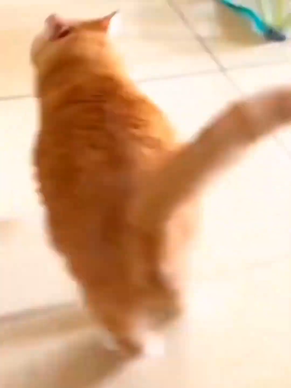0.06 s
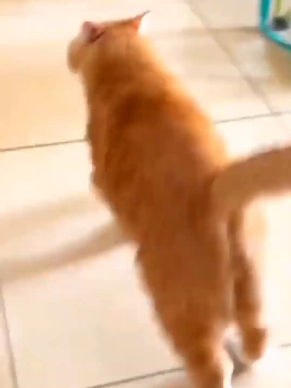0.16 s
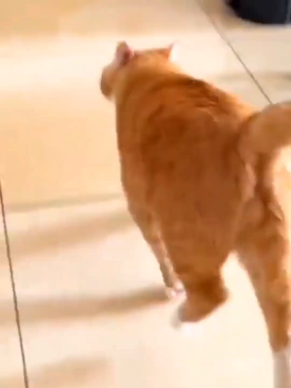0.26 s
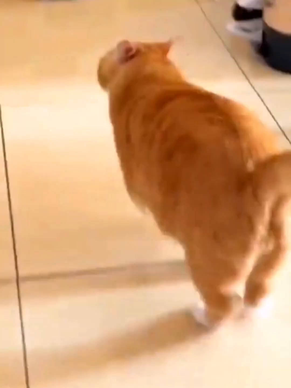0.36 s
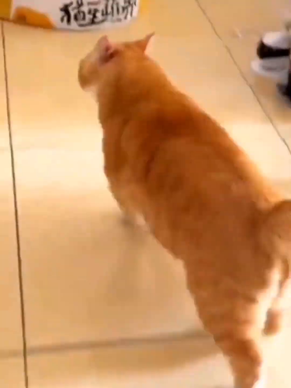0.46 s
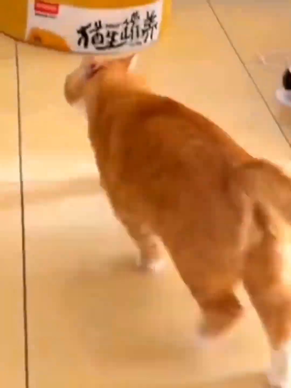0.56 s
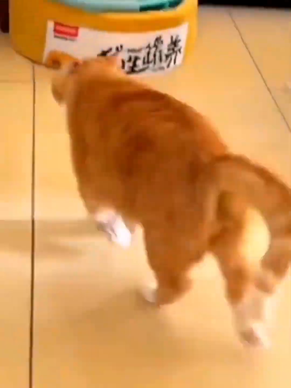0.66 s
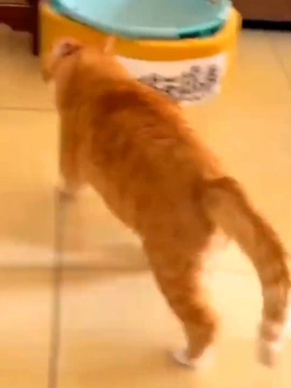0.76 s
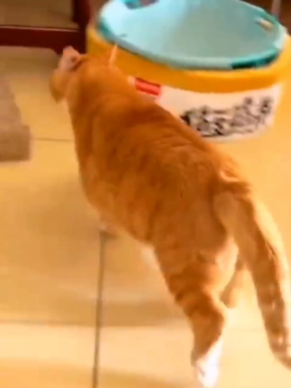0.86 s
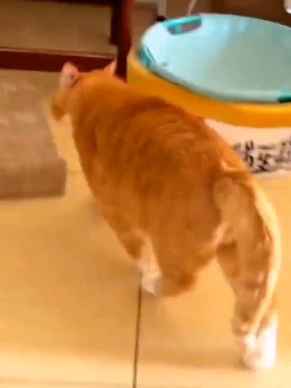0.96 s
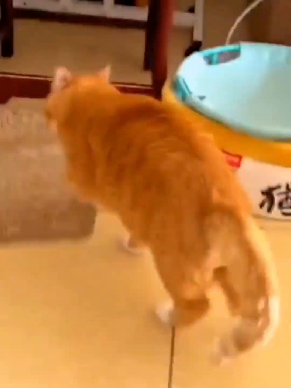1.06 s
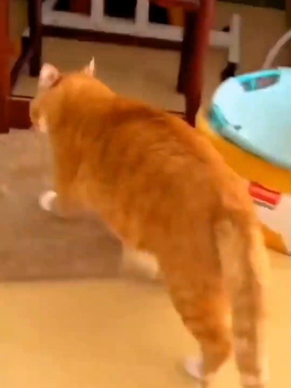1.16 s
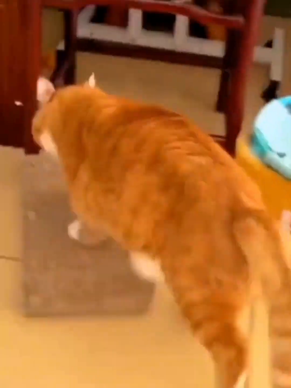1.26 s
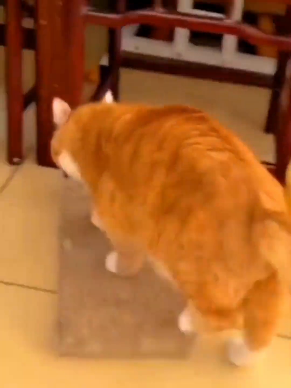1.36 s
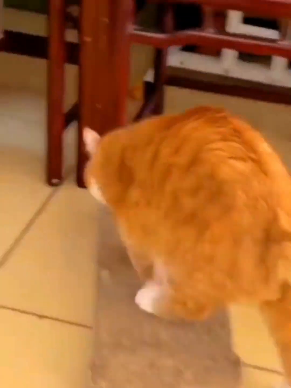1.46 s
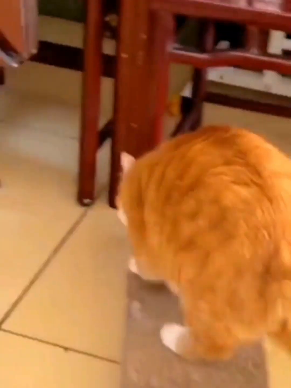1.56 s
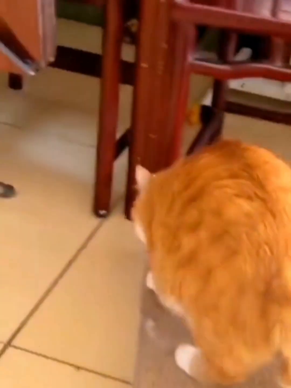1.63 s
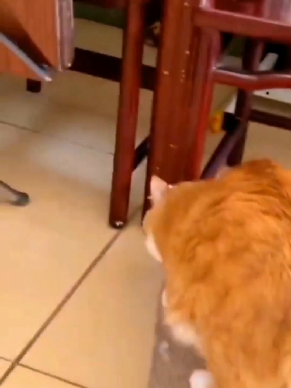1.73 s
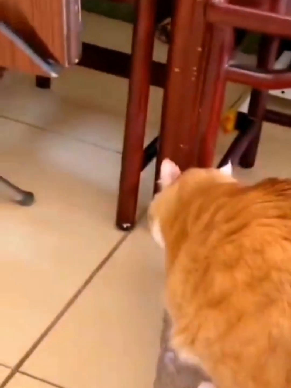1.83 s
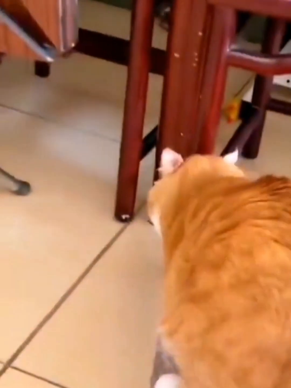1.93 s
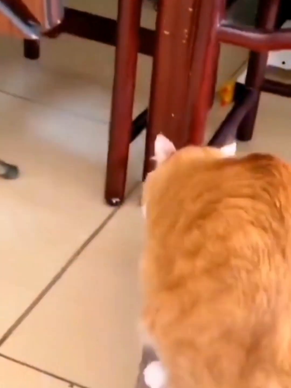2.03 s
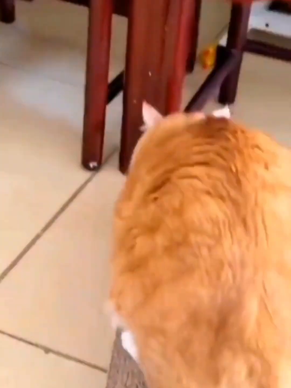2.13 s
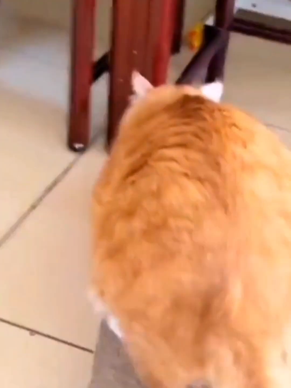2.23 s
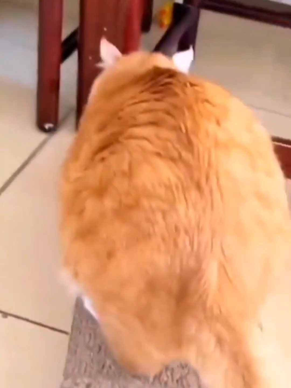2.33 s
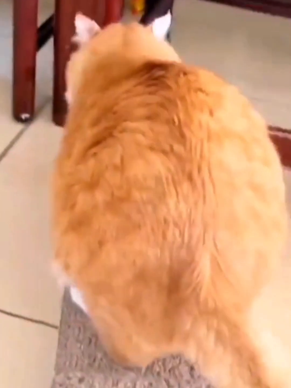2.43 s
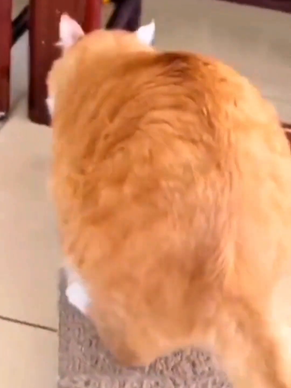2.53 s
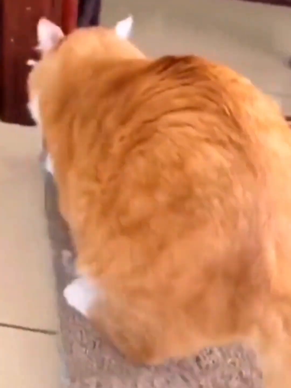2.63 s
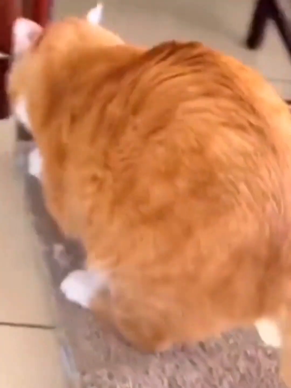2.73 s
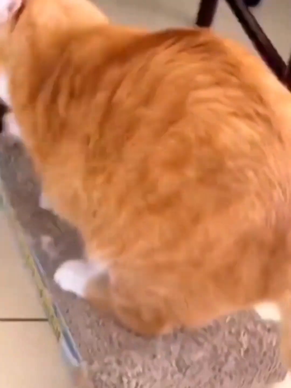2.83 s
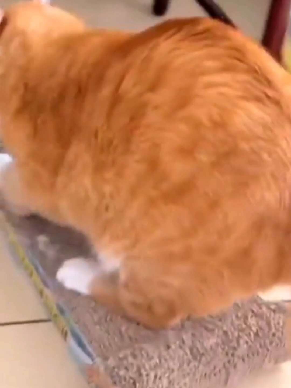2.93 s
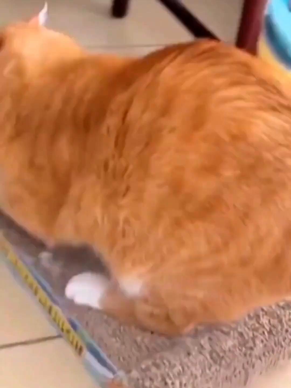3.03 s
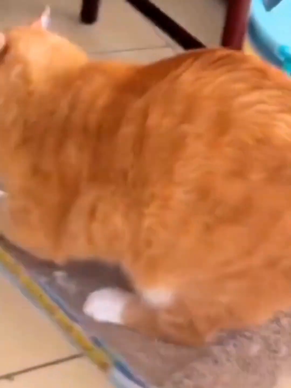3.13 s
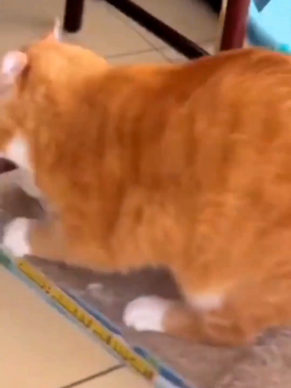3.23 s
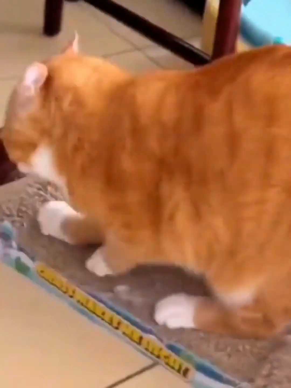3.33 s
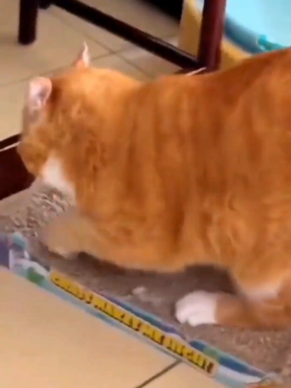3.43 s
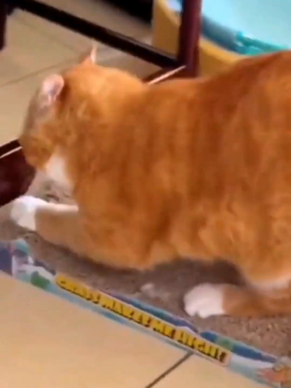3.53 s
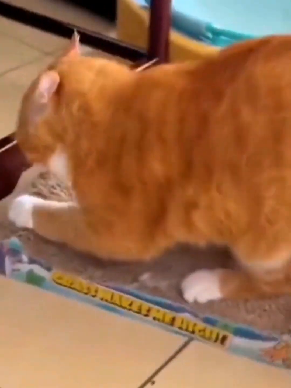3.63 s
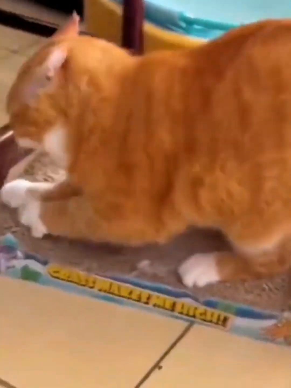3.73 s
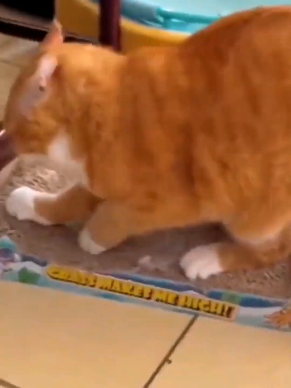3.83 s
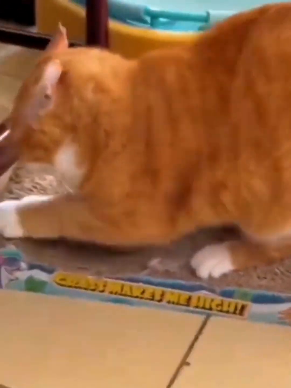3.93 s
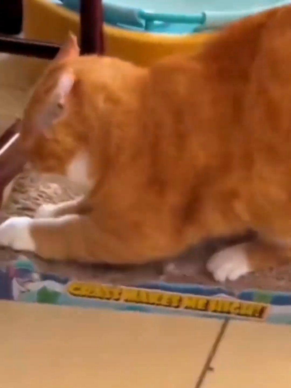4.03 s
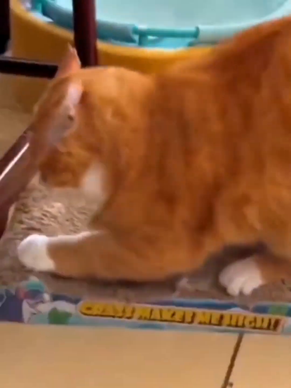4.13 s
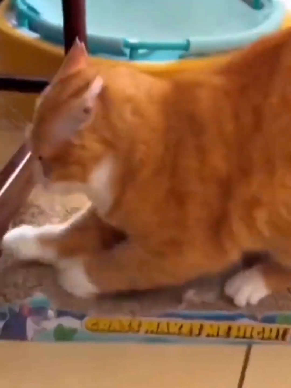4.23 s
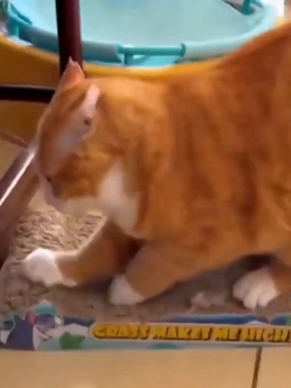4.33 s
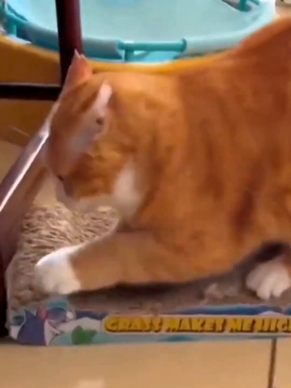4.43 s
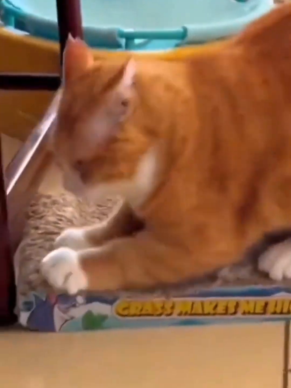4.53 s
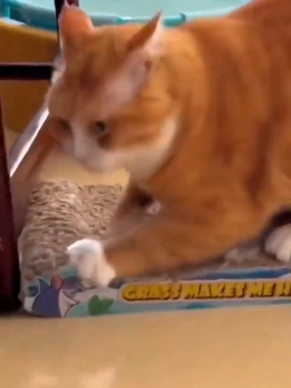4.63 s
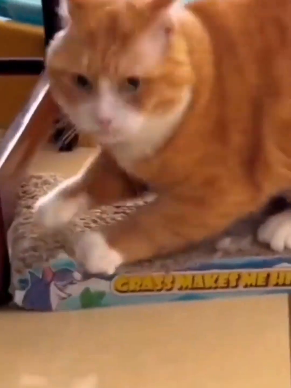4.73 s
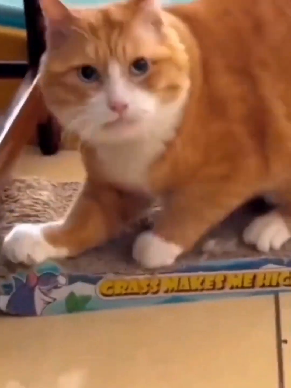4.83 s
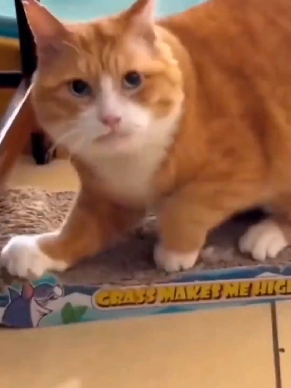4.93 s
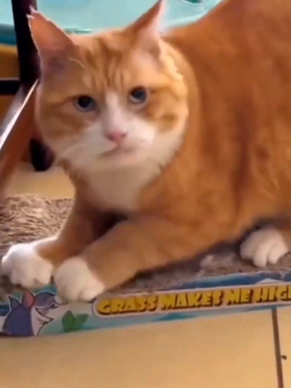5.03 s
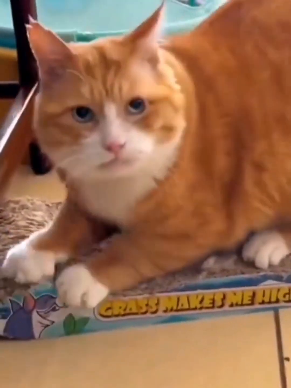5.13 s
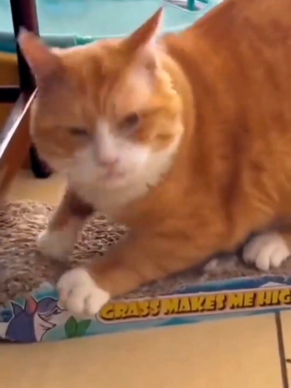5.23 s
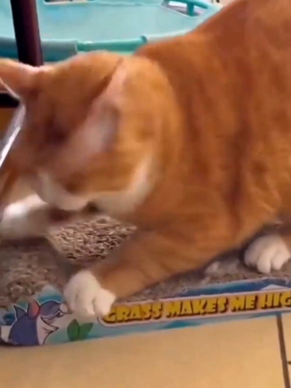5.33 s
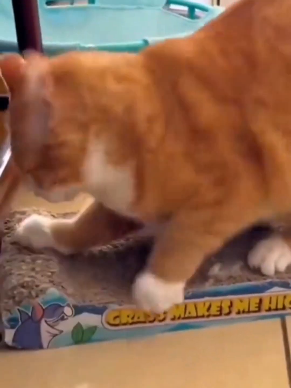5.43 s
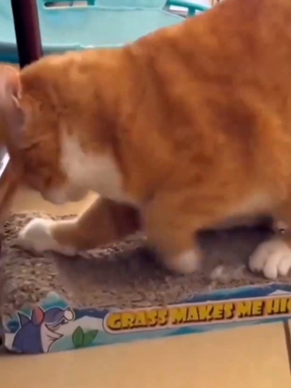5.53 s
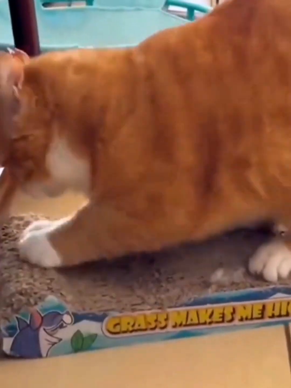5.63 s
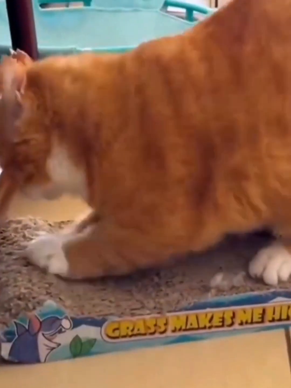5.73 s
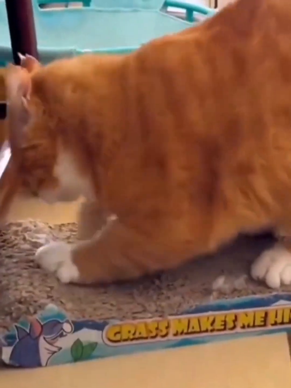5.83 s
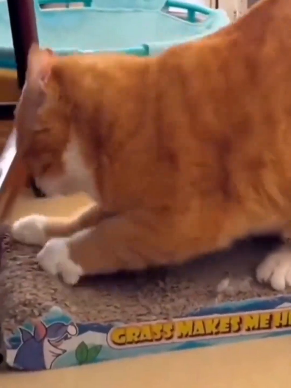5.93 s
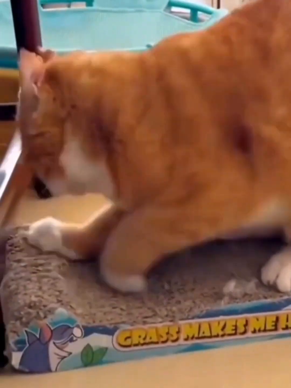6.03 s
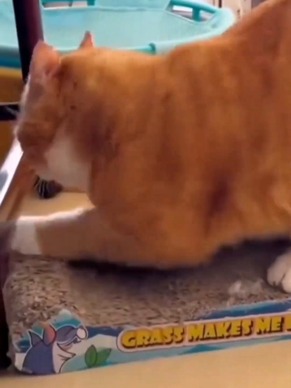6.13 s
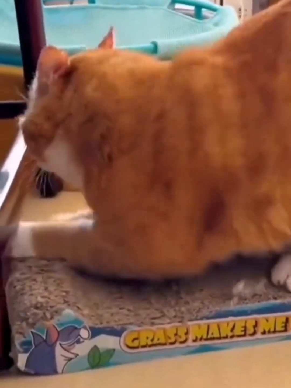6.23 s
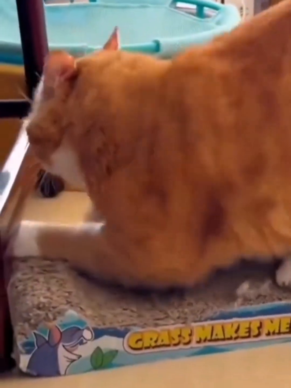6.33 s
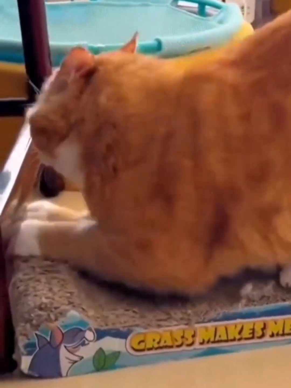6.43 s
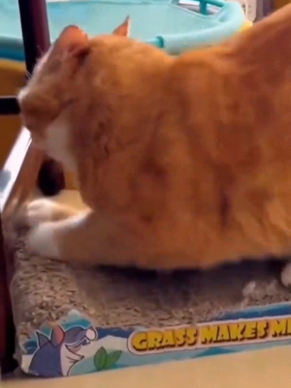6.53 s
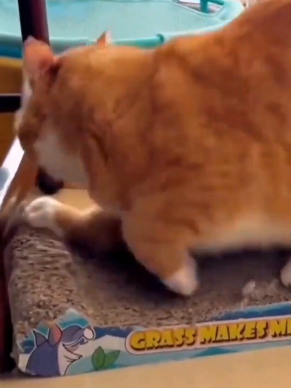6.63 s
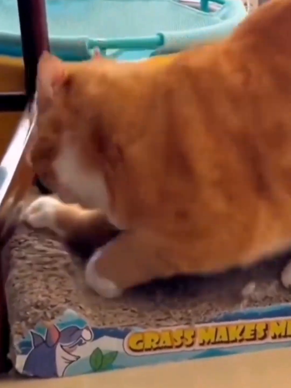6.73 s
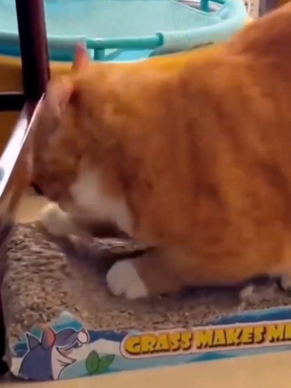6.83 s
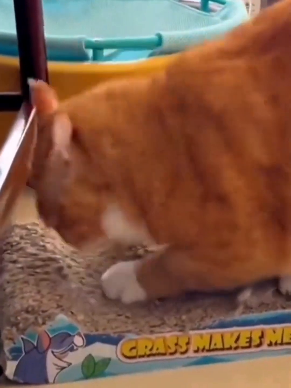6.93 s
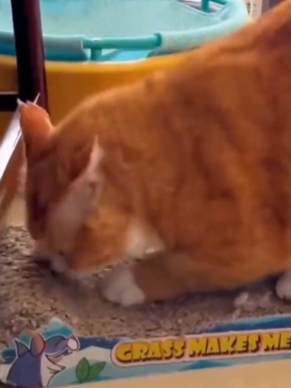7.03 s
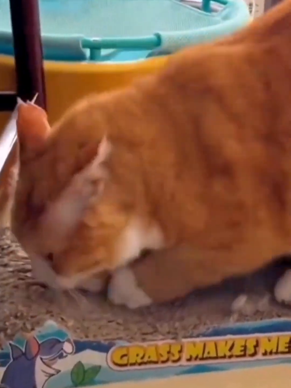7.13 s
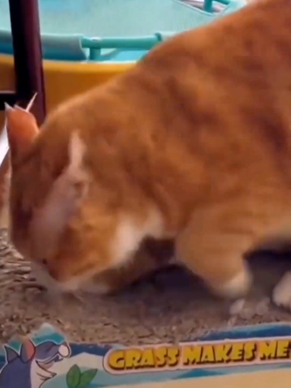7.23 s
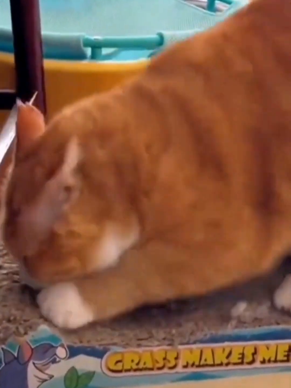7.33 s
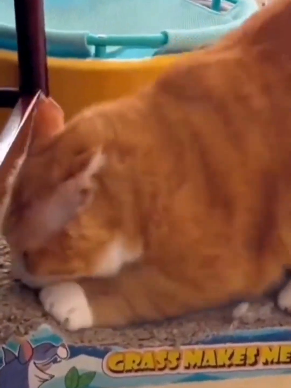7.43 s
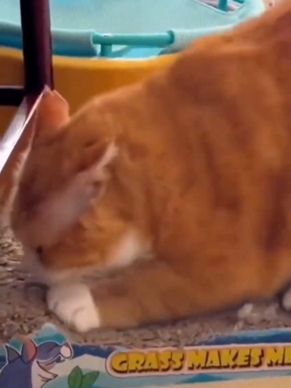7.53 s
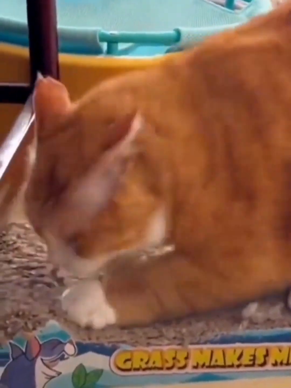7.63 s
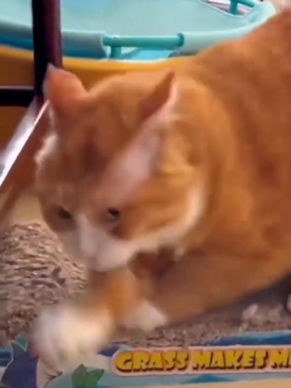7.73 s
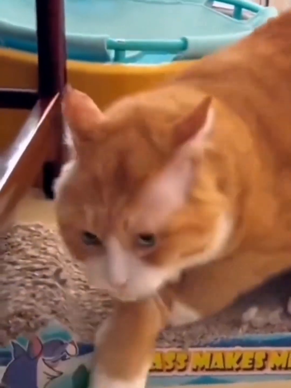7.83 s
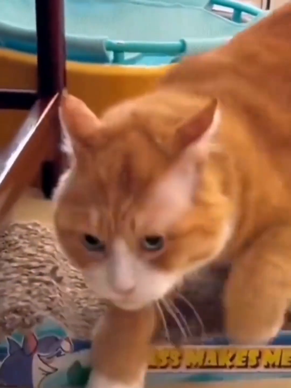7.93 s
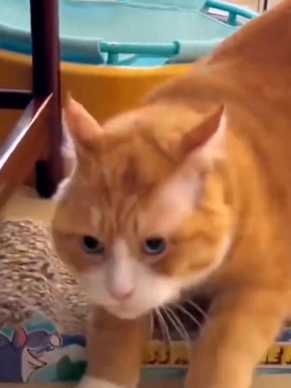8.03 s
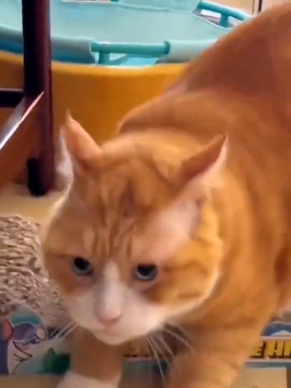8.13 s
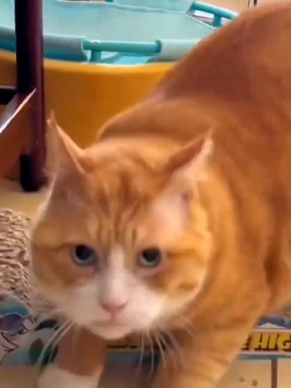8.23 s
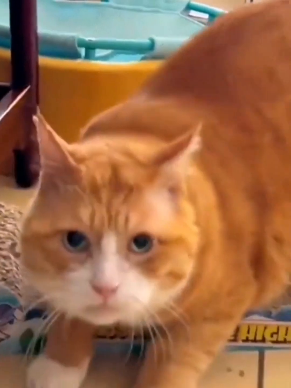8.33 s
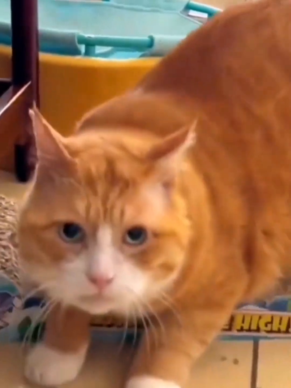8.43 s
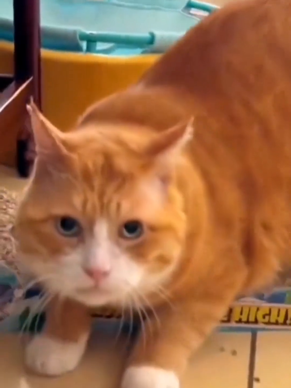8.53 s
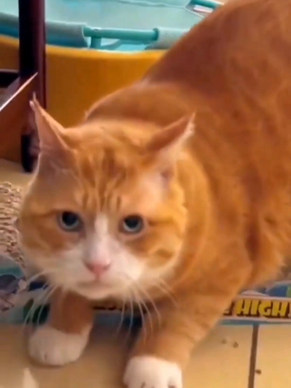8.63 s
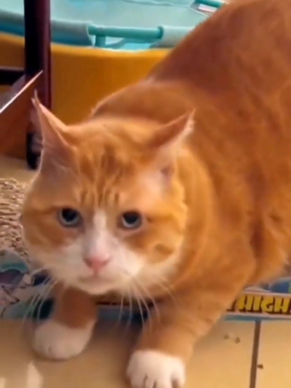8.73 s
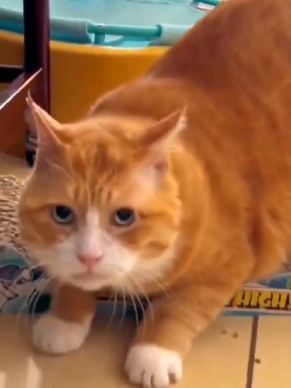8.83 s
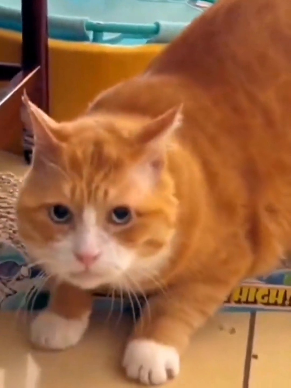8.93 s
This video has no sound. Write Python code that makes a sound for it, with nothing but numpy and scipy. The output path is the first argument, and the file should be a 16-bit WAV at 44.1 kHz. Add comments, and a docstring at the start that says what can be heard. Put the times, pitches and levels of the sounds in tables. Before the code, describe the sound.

A few soft footsteps cross a tiled floor with a dull bump. Then a cat claws a corrugated cardboard scratcher close to the microphone: short, uneven scrapes drum the hollow board, tear fibres and snap free, with fur rubbing in between. The scratching stops near the end, leaving a low room hum. The hand-held microphone rumbles faintly, and the room has a short echo.

```python
"""A cat rakes a corrugated cardboard scratcher with both front paws, close ahead of the microphone.
Claws skip across the flutes, drumming the hollow board, tearing fibres and snapping free; fur rubs.
The place is a room with a tiled floor, a short echo and a low hum. The cat first walks to the board,
and a person follows with a hand-held camera: soft steps, dull bumps and handling rumble reach
its stereo microphone, and a limiter holds the peaks."""
import sys
import numpy as np
from scipy import signal
from scipy.fft import rfft, irfft, next_fast_len
from scipy.io import wavfile
from scipy.ndimage import uniform_filter1d, minimum_filter1d

SR = 44100
rng = np.random.default_rng(int(sys.argv[2]) if len(sys.argv) > 2 else 0)


def unload_audio(sound):
    """Save the sound as a 16-bit wav file, at the path given as the first command line argument."""
    columns = np.transpose(np.atleast_2d(sound))
    # keep every value between -1 and 1, then stretch to whole-number steps
    steps = np.round(np.clip(columns, -1, 1) * 32767)
    wavfile.write(sys.argv[1], SR, steps.astype(np.int16))


N = 395577
TIME = np.arange(N) / SR

# pulls of a paw: (start [s], length [s], force [dB], board pitch [Hz], tearing [dB])
PAW_PULLS = [(1.454, 0.15, -29.5, 500, -34.5), (1.63, 0.022, -18.5, 456, -24.5),
             (1.662, 0.031, -10.5, 573, -20), (1.846, 0.042, -10, 750, -16.5),
             (2.116, 0.069, -15.5, 634, -37), (2.248, 0.099, -15, 740, -26.5),
             (2.344, 0.031, -7.5, 734, -20), (2.568, 0.046, -17.5, 635, -28), (2.687, 0.045, -8, 725, -13),
             (2.79, 0.059, -30, 593, -25), (3.009, 0.065, -22.5, 450, -20.5), (3.07, 0.08, -24, 646, -18),
             (3.175, 0.056, -15, 800, -18), (3.445, 0.048, -17.5, 730, -28.5),
             (3.512, 0.15, -23.5, 656, -27), (3.665, 0.042, -12, 690, -20), (3.927, 0.088, -18.5, 635, -32),
             (4.015, 0.048, -19.5, 614, -20.5), (4.109, 0.042, -12, 640, -19),
             (4.286, 0.069, -26, 610, -35.5), (4.489, 0.11, -22, 640, -25),
             (4.629, 0.053, -13.5, 700, -23.5), (4.716, 0.039, -17, 637, -18),
             (4.953, 0.07, -30.5, 545, -33), (5.029, 0.042, -21, 534, -27), (5.281, 0.03, -8, 680, -21),
             (5.589, 0.087, -15.5, 790, -30), (5.872, 0.025, -16, 657, -31.5),
             (6.121, 0.028, -23, 730, -48), (6.333, 0.038, -20.5, 526, -27.5), (6.43, 0.037, -17, 513, -26),
             (6.468, 0.063, -21, 617, -44), (6.697, 0.085, -21, 529, -38.5), (6.768, 0.053, -22, 675, -51),
             (6.983, 0.028, -17.5, 784, -26.5), (7.042, 0.047, -14, 693, -32),
             (7.357, 0.049, -24.5, 670, -36), (7.455, 0.035, -23, 570, -25.5),
             (7.564, 0.057, -14, 595, -23.5), (7.673, 0.034, -22.5, 603, -34.5),
             (7.756, 0.039, -20, 720, -24), (7.972, 0.25, -78, 670, -43), (8.918, 0.1, -36.5, 685, -32)]
# soft footfalls on the tiles: (time [s], sole level [dB], tick level [dB])
FOOTSTEPS = [(0.063, -40, -41.5), (0.225, -24.5, -35.5), (0.292, -22, -43), (0.344, -15, -34),
             (0.713, -18.5, -33.5), (0.918, -23.5, -41.5), (1.06, -15, -48), (1.336, -28.5, -42)]
# spectrum of the shaken board: (frequency [Hz], level [dB])
BOARD_SPECTRUM = [(45, 0.5), (240, 7.5), (590, 14.5), (1350, 9), (2050, 6), (2750, -2.5), (5100, -3.5),
                  (11000, -46)]
# spectrum of tearing paper: (frequency [Hz], level [dB])
TEAR_SPECTRUM = [(500, 4), (1500, 3.5), (2900, 0.5), (4000, 4.5), (5200, -1.5), (6600, 0), (8000, -20.5),
                 (13000, -48)]
# spectrum of fine fibres parting: (frequency [Hz], level [dB])
HISS_SPECTRUM = [(2500, -3.5), (7000, 6), (12300, 2.5), (13500, -27)]
# the part of the room sound that differs between left and right: (frequency [Hz], level [dB])
ROOM_WIDTH = [(70, -45), (260, -7), (3500, 1), (8500, 3.5)]
SWAY_S, SETTLE_S = 0.048, 0.057  # rise and decay of the rustle and camera jolt at each step


def scratcher(pull_db=-2):
    """The cat at the board: every pull and pluck rings on in a mode of the whole scratcher."""
    # a claw snaps free of a flute or taps it: (time [s], board [dB], board pitch [Hz], crack [dB])
    plucks = [(1.847, -0.5, 1125, -17), (2.586, -18, 820, -33), (2.949, -15, 1120, -18),
              (3.019, -30, 1220, -17), (3.361, -17.5, 784, -46), (3.465, -27, 704, -42),
              (3.52, -11.5, 780, -21.5), (3.54, -8, 755, -8.5), (3.564, -18, 634, -13),
              (3.919, -13, 1120, -12.5), (4.468, -8.5, 560, -23), (4.505, -12, 620, -38),
              (4.974, -17.5, 566, -24), (5.066, -15, 830, -13.5), (5.495, -11.5, 940, -46),
              (5.562, -16, 814, -35), (5.653, -11.5, 770, -37), (5.731, -9.5, 1030, -23.5),
              (5.795, -15.5, 860, -20), (5.849, -9, 820, -17.5), (6.13, -7.5, 690, -36),
              (6.16, -12.5, 816, -48), (6.266, -13, 995, -34), (6.35, -11.5, 518, -35),
              (6.435, -4.5, 500, -23.5), (6.545, -16.5, 537, -42), (6.686, -6.5, 777, -24),
              (6.699, -13, 750, -27), (6.902, -12.5, 1570, -23), (7.043, -5, 1010, -14.5),
              (7.368, -12.5, 1260, -26), (7.39, -7.5, 700, -30), (7.565, -18, 960, -20.5),
              (7.757, -11.5, 770, -38), (7.965, -31.5, 1410, -63), (8.012, -30.5, 1840, -39),
              (8.36, -59, 1890, -38.5)]
    # hiss of the fine fibres against the tearing: (time [s], level [dB])
    fibre_hiss = [(1.46, -5), (1.85, -45), (2.7, -14), (3.07, -8), (3.18, -14.5), (4.1, -11), (4.4, -2),
                  (4.72, -8.5), (4.97, 6), (5.6, -7), (7.95, -12), (8.92, 9)]
    # rasp of the stiff walls against the force, lower on a hollower spot: (time [s], level [dB])
    wall_rasp = [(5.3, 2.5), (5.55, 0), (6.75, 3), (7.0, 6)]
    # mode of the whole scratcher: (frequency [Hz], bandwidth [Hz], level [dB])
    board_modes = [(609, 9, -15)]
    claws = np.zeros(N)
    for start, length, force_db, hz, tear_db in PAW_PULLS:
        hiss_db = tear_db + np.interp(start, *np.transpose(fibre_hiss))
        rasp_db = np.interp(start, *np.transpose(wall_rasp))
        onset, sound = paw_pull(start, length, force_db, hz, tear_db, hiss_db, rasp_db)
        add(claws, onset, amp(pull_db) * sound)
    for onset, board_db, hz, crack_db in plucks:
        add(claws, onset, claw_snap(board_db, hz, crack_db))
    return claws + sum(amp(db) * resonate(claws, hz, hz / width) for hz, width, db in board_modes)


def paw_pull(start, length, board_db, hz, tear_db, hiss_db, rasp_db,
             attack_s=0.0046, release_s=0.0073, arch_db=7.0, lead=0.057,
             scrape=0.51, glide=-0.31, wall_ratio=1.706, bite=0.11, hiss_rise=0.36, size=11000):
    """Each slip drums the hollow board, each snag tears paper, fibres hiss; returns (onset, sound)."""
    t = np.arange(size) / SR
    along = np.minimum(t / length, 1) - .5
    contact = np.minimum(t / attack_s, 1) * np.exp(-np.maximum(t - length, 0) / release_s)
    grip = contact * amp(-arch_db * (2 * (along + lead)) ** 2)  # hardest just before mid-pull
    jumps = slips(size, per_s=400, jitter=.7, spread_db=3.5)
    snags = slips(size, per_s=130, jitter=0.6, spread_db=2.5)
    rip = unit(unit(fade(snags, seconds=0.0028)) + .7)
    force = (unit(jumps - jumps.mean()) + scrape * rip * rng.standard_normal(size)) * grip
    shake = colour(dispersed(force, seconds=0.00067), BOARD_SPECTRUM)
    note = hz * (1 + glide * along)  # sinks as the paw is drawn in
    drum = hollow(shake, note, q=1.64)
    spot_ring = amp(-2.5) * resonate(drum, hz, q=51)  # the spot under the paw rings on
    drum = amp(board_db) * unit(drum + spot_ring)
    # claws that bite deeper also rasp the stiff walls
    wall_db = board_db + rasp_db + bite * (tear_db - board_db)
    rasp = amp(wall_db) * hollow(shake * rip, wall_ratio * note, q=0.77)
    # fibres part one by one, in clumps behind each snag; their hiss builds as the claws sink in
    breaks = crackle(size, per_s=7000, spread_db=1.0) * rip * grip
    tear = dispersed(colour(breaks, TEAR_SPECTRUM), seconds=.0006)
    swell = np.minimum(t / (hiss_rise * length), 1)
    fine_breaks = crackle(size, per_s=9000, spread_db=4.0) * np.sqrt(rip) * grip * swell
    hiss = colour(fine_breaks, varied(HISS_SPECTRUM, db=3.0))
    sound = drum + rasp + amp(tear_db) * unit(tear) + amp(hiss_db) * unit(hiss)
    return start - attack_s / 2, sound * np.sqrt(length / t[-1])


def claw_snap(board_db, hz, crack_db, span_s=0.0091, peak_cycles=2.07, swing_cycles=1.25,
              rebound_s=0.00578, rebound_db=-7, rebound_ratio=0.743,
              rattle_db=-5, rattle_cycles=7, size=3000):
    """A flute cracks; the board swings a few times, drops back with a lower knock and rattles."""
    t = np.arange(size) / SR
    rattle = rng.standard_normal(size) * np.exp(-t * hz / rattle_cycles)  # briefer at higher notes
    swing, rebound = (
        np.sin(2 * np.pi * turns) * np.exp(-((turns - peak_cycles) / swing_cycles) ** 2) * (turns > 0)
        for turns in (hz * t, rebound_ratio * hz * (t - rebound_s)))
    board_rattle = unit(resonate(colour(rattle, BOARD_SPECTRUM), hz, q=0.43))
    knock = unit(unit(swing + amp(rebound_db) * rebound) + amp(rattle_db) * board_rattle)
    tip = rng.standard_normal(size) * np.exp(-t / .0013)
    burst = tip + 0.25 * rattle
    crack = unit(colour(burst, TEAR_SPECTRUM) + 0.14 * colour(burst, HISS_SPECTRUM))
    return (amp(board_db) * knock + amp(crack_db) * crack) * np.sqrt(span_s / t[-1])


def slips(n, per_s, jitter, spread_db, count=160):
    """A claw jumps from flute to flute at uneven intervals, with uneven force."""
    gap, size = rng.standard_normal((2, count))
    at = np.cumsum(np.exp(jitter * gap)) * SR / per_s
    at = (at - at[0] * rng.random()).astype(int)
    force = amp(spread_db * np.clip(size, -2, 1.5))
    train = np.zeros(n)
    np.add.at(train, at[at < n], force[at < n])
    return train


def crackle(n, per_s, spread_db):
    """Random impulses of uneven size, as of fibres breaking."""
    chance, size, push = rng.random(n), rng.standard_normal(n), rng.choice([-1, 1], n)
    return (chance < per_s / SR) * push * amp(spread_db * np.minimum(size, 2))


def dispersed(x, seconds, size=600):
    """Bending waves cross the board by many paths, smearing each knock over a few milliseconds."""
    paths = rfft(rng.standard_normal(size) * np.exp(-np.arange(size) / (seconds * SR)), 2 * size)
    smear = irfft(paths / np.sqrt(abs(paths)))[:size]
    return signal.fftconvolve(x, smear)[:len(x)]


def varied(spectrum, db):
    """Every claw and every spot of paper has a colour of its own."""
    return [(hz, value + db * rng.standard_normal()) for hz, value in spectrum]


def brushing(patchy_db=3.5, slide_db=-12.5, rustle_db=-26.5, graze_db=-20, patch_samples=900):
    """Fur and pads drag with an uneven grain as the cat moves and its paws slide; each step rustles."""
    # fur rubbing as the cat moves about: (time [s], level [dB])
    cat_motion = [(0, -35), (1.3, -38), (1.7, -32.5), (2.9, -30), (3.7, -26), (4.3, -29), (4.88, -37),
                  (5.15, -31), (5.45, -34), (6.0, -37.5), (6.5, -32.5), (6.85, -36), (7.3, -35),
                  (7.75, -33), (8.2, -61)]
    # spectrum of rubbing fur: (frequency [Hz], level [dB])
    fur_spectrum = [(60, -5), (400, 2.5), (1500, -4), (6500, -18), (13000, -36)]
    uneven = uniform_filter1d(rng.standard_normal(N), patch_samples)
    uneven = unit(uniform_filter1d(uneven, patch_samples // 2))
    grain = crackle(N, per_s=9000, spread_db=2.5) * amp(patchy_db * np.tanh(uneven))
    drag = unit(colour(grain, fur_spectrum))
    # the paw reaches out before each pull and slides off after it
    mid_pulls = [(start + length / 2, db) for start, length, db, *_ in PAW_PULLS]
    slide = swells(mid_pulls, rise_s=0.031, decay_s=0.026)
    rustle = swells(FOOTSTEPS, SWAY_S, SETTLE_S)
    rubbing = level(cat_motion) + amp(slide_db) * slide + amp(rustle_db) * rustle
    # claw tips graze single flutes as a paw slides
    grazes = fade(abs(crackle(N, per_s=45, spread_db=5.0)), seconds=0.0036) * rng.standard_normal(N)
    return rubbing * drag + amp(graze_db) * slide * unit(colour(grazes, BOARD_SPECTRUM))


def footfalls(tick_hz=1490, tick_s=0.004, bump_s=0.005):
    """Soft soles scuff the tiles and land with a tick; now and then something takes a dull bump."""
    # spectrum of a soft sole on tile: (frequency [Hz], level [dB])
    sole_spectrum = [(30, -17), (150, 4), (480, -1.5), (700, -8.5), (4500, -24.5), (13000, -51)]
    # dull bumps and knocks: (time [s], level [dB], pitch [Hz])
    bumps = [(1.081, -8, 485), (1.479, -20.5, 390), (2.11, -15.5, 91), (3.035, -12.5, 270),
             (3.807, -11.5, 105), (6.354, -14, 268), (6.607, -15.5, 310)]
    weight = swells(FOOTSTEPS, rise_s=0.014, decay_s=0.044)
    steps = colour(weight * rng.standard_normal(N), sole_spectrum)
    steps /= np.std(colour(rng.standard_normal(N), sole_spectrum))  # cancels the filter's gain
    t = np.arange(SR // 8) / SR
    for onset, _, tick_db in FOOTSTEPS:
        tap = rng.standard_normal(len(t)) * np.exp(-t / tick_s)
        add(steps, onset, amp(tick_db) * hollow(tap, tick_hz, q=0.81))
    thud = t / bump_s * np.exp(1 - t / bump_s)
    for onset, db, hz in bumps:
        add(steps, onset, amp(db) * thud * np.sin(2 * np.pi * hz * t))
    return steps


def handling(jolt_db=-9):
    """Handling noise at the microphone: the camera rumbles in the hand and is jolted by each step."""
    # rumble, strongest as the camera is lowered to the cat: (time [s], level [dB])
    hand_motion = [(0, -30.5), (2.95, -35), (3.08, -24), (3.7, -34), (5.2, -60)]
    # spectrum of the handling rumble: (frequency [Hz], level [dB])
    rumble_spectrum = [(30, -22), (58, 14), (100, 4), (350, -6), (1000, -54.5)]
    rumble = level(hand_motion) * drone(rumble_spectrum, width=0.14)
    jolts = amp(jolt_db) * swells(FOOTSTEPS, SWAY_S, SETTLE_S)
    return rumble + jolts * drone(rumble_spectrum, width=0.71)


def out_of_step(x, above_hz=6800, db=-1):
    """The highest treble reaches the two microphone ports out of step; returns the part that differs."""
    treble = signal.sosfiltfilt(signal.butter(2, above_hz, "high", fs=SR, output="sos"), x)
    return amp(db) * signal.hilbert(treble, next_fast_len(N)).imag[:N]


def room_echo(x, early_boost=0.69, early_s=0.019, size=256):
    """Dense reflections from tiles and furniture, each band dying at its own speed."""
    # reverberation of the room: (frequency [Hz], time to fall 60 dB [s])
    decay_times = [(150, 0.5), (600, 0.4643), (1400, 0.29), (8000, 0.67)]
    t = np.arange(SR // 2) / SR
    taps = crackle(len(t), per_s=3400, spread_db=0.5) * (t > .003)
    taps *= 1 + early_boost * np.exp(-t / early_s)
    hz, age, bands = signal.stft(taps, SR, nperseg=size)
    decay = amp(-60 * age / read(decay_times, hz)[:, None])
    tail = signal.istft(bands * decay, SR, nperseg=size)[1]
    return signal.fftconvolve(x, tail / np.linalg.norm(tail))[:N]


def room_hum(db=-40):
    """Room tone: a steady low hum, alike left and right in the bass and diffuse above."""
    # spectrum of the hum: (frequency [Hz], level [dB])
    hum_spectrum = [(20, -33), (65, -2.5), (112, -10.5), (149, 0), (200, -14.5), (700, -27), (5500, -41)]
    mid, side = (unit(colour(noise, hum_spectrum)) for noise in rng.standard_normal((2, N)))
    side = colour(side, [(hz, min(width_db, 0)) for hz, width_db in ROOM_WIDTH])
    return amp(db) * np.array([mid + side, mid - side])


def drone(spectrum, width):
    """Steady coloured noise, mostly shared by both channels."""
    mid, side = (unit(colour(noise, spectrum)) for noise in rng.standard_normal((2, N)))
    return np.array([mid + width * side, mid - width * side])


def hollow(x, hz, q):
    """A steep resonance that can follow a moving pitch, scaled to rms 1."""
    turn = np.exp(2j * np.pi * np.cumsum(hz * np.ones(len(x))) / SR)
    pole = np.exp(-np.pi * np.mean(hz) / q / SR)
    return unit((turn * signal.lfilter([1], [1, -2 * pole, pole * pole], x / turn)).real)


def resonate(x, hz, q):
    """A band-pass resonance of gain 1."""
    return signal.lfilter(*signal.iirpeak(hz, max(q, .5), fs=SR), x)


def colour(x, spectrum, size=4096):
    """Causal filter with a given spectrum, so clicks keep their sharp front."""
    log_gain = np.log(amp(read(spectrum, abs(np.fft.fftfreq(size, 1 / SR)))))
    response = np.fft.ifft(np.exp(np.conj(signal.hilbert(log_gain)))).real[:size // 2]
    return signal.fftconvolve(x, response)[:len(x)]


def fade(x, seconds):
    """Lets every impulse die away exponentially."""
    return signal.lfilter([1], [1, -np.exp(-1 / (seconds * SR))], x)


def swells(events, rise_s, decay_s):
    """Gain from rows (time [s], level [dB]): each swells up to its moment and dies away."""
    return sum(amp(db) * np.exp(-np.maximum((peak - TIME) / rise_s, (TIME - peak) / decay_s))
               for peak, db, *_ in events)


def level(curve):
    """Gain gliding through rows (time [s], level [dB])."""
    return amp(np.interp(TIME, *np.transpose(curve)))


def read(points, hz):
    """Reads a table on a log-frequency axis."""
    frequencies, values = np.transpose(points)
    return np.interp(np.log(hz + 1), np.log(frequencies), values)


def add(mix, onset, sound):
    """Mixes a sound in at an onset in seconds."""
    part = mix[max(round(onset * SR), 0):][:len(sound)]
    part += sound[:len(part)]


def amp(db):
    """Decibels to gain."""
    return 10 ** (np.asarray(db) / 20)


def unit(x):
    """Scales to rms 1."""
    return x / np.sqrt(np.mean(x ** 2) + 1e-20)


def scene(wet_db=-7.0, claw_width_db=-12, fur_width_db=-9, step_width_db=-9):
    """The cat close and on axis, the room around it; steps and fur sound wider than the claws."""
    claws, fur, steps = scratcher(), brushing(), footfalls()
    near = claws + fur + steps
    mid = near + amp(wet_db) * room_echo(near)
    spread = amp(claw_width_db) * claws + amp(fur_width_db) * fur + amp(step_width_db) * steps
    side = colour(room_echo(spread), ROOM_WIDTH) + out_of_step(claws + fur)
    return np.array([mid + side, mid - side]) + handling() + room_hum()


def record(dry, ceiling=.92, recovery_db_per_s=520, smooth_samples=45, edge_hz=13350):
    """The camera's fast limiter holds the peaks under full scale; a low-pass cuts the top treble."""
    over_db = np.maximum(20 * np.log10(abs(dry).max(0) / ceiling + 1e-9), 0)
    fall = TIME * recovery_db_per_s
    held_db = np.maximum.accumulate(over_db + fall) - fall
    gain_db = uniform_filter1d(minimum_filter1d(-held_db, smooth_samples), smooth_samples)
    low_pass = signal.firwin(255, edge_hz, window=("kaiser", 9), fs=SR)
    return signal.oaconvolve(dry * amp(gain_db), low_pass[None], "same")


dry = scene()
out = record(dry)
unload_audio(out)
```